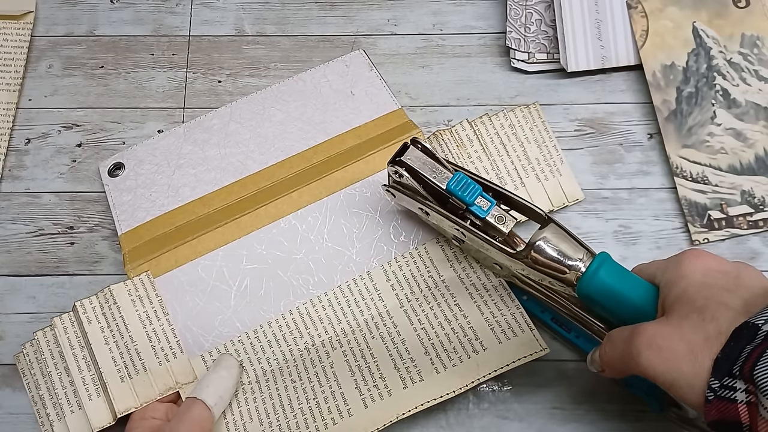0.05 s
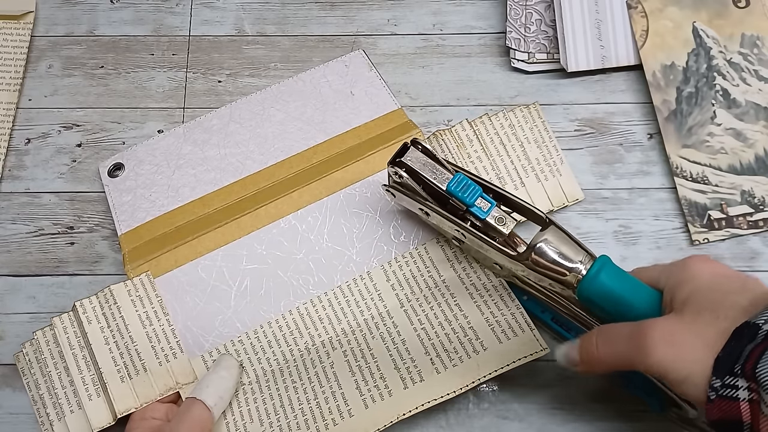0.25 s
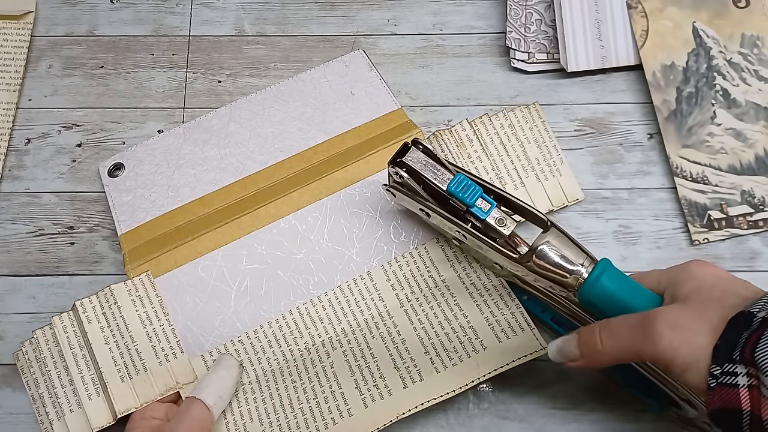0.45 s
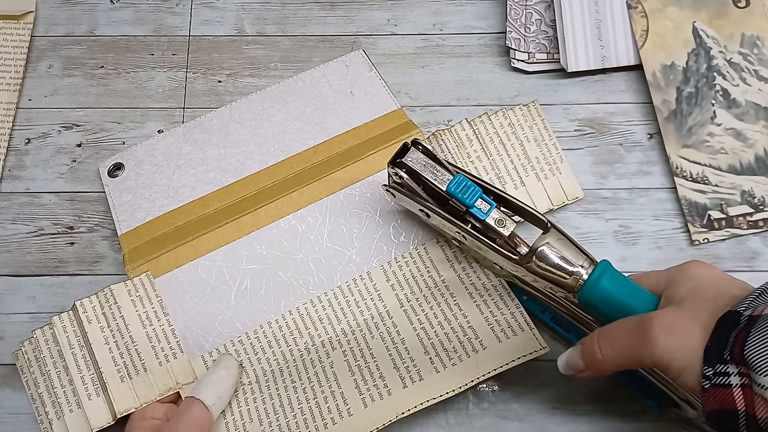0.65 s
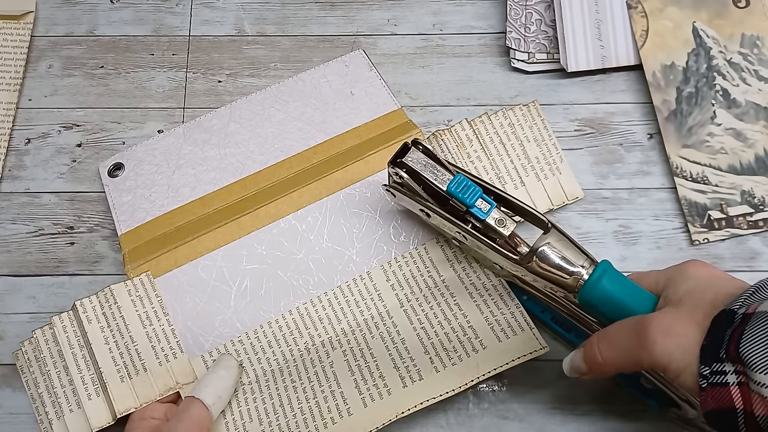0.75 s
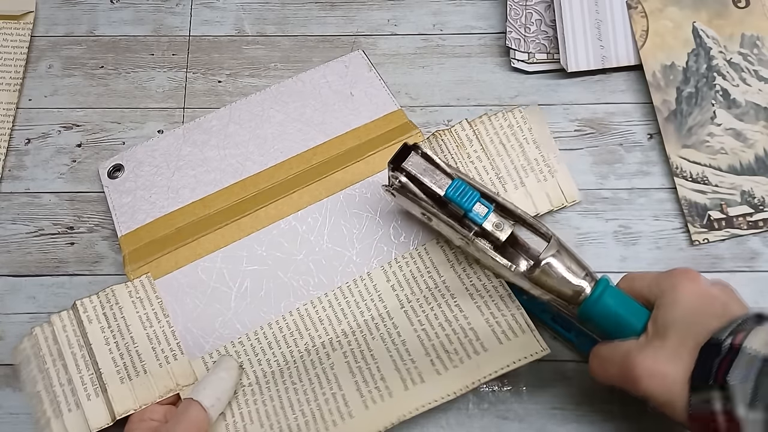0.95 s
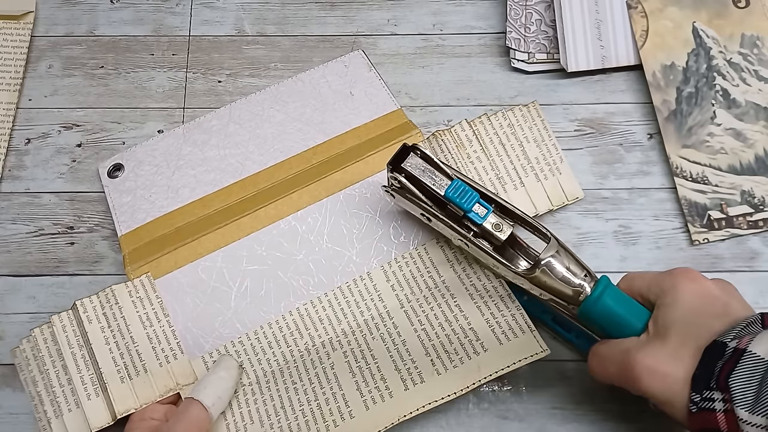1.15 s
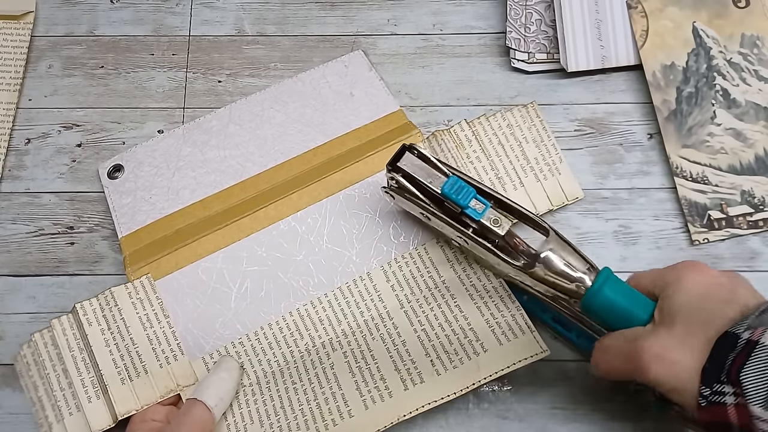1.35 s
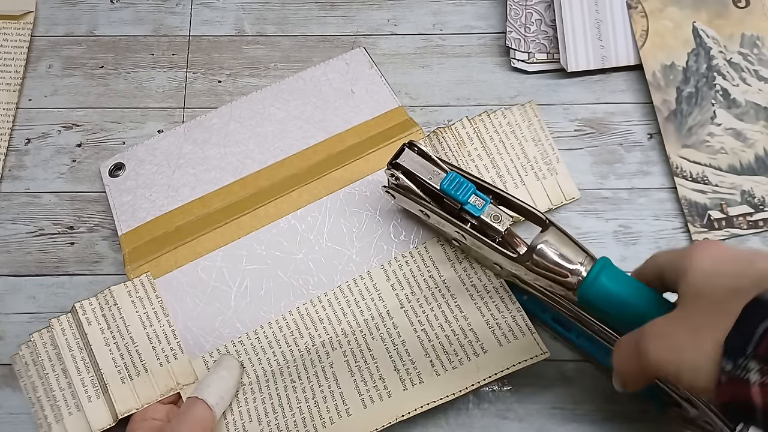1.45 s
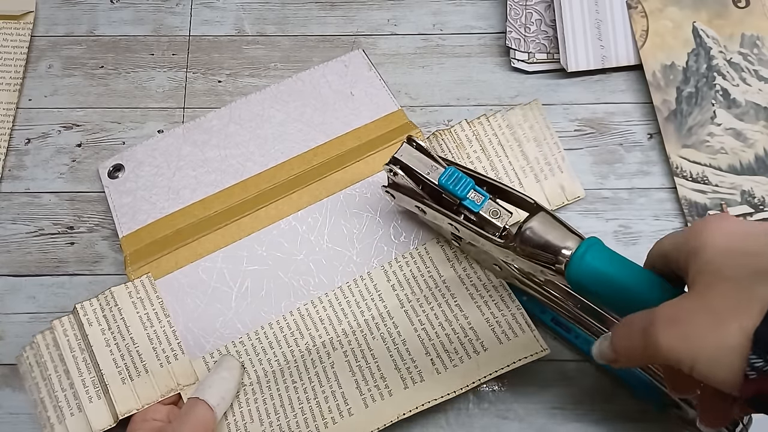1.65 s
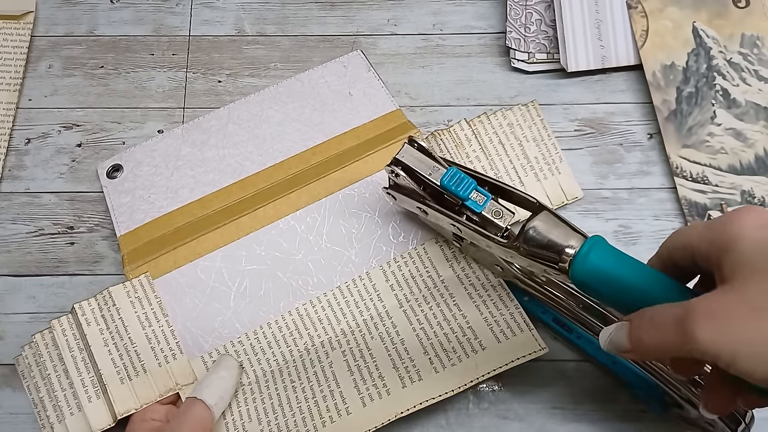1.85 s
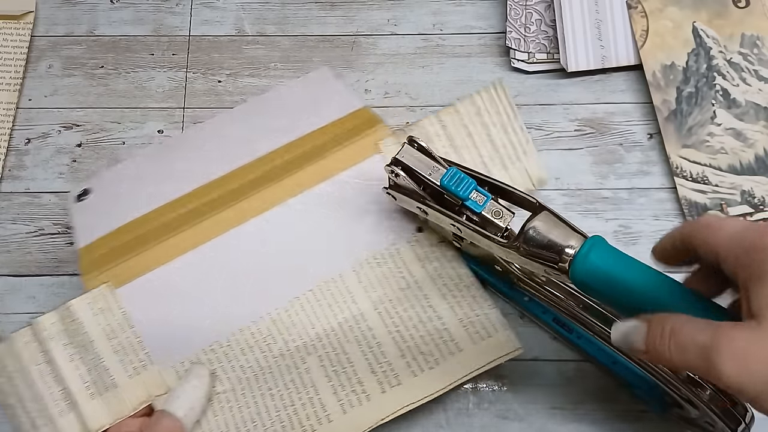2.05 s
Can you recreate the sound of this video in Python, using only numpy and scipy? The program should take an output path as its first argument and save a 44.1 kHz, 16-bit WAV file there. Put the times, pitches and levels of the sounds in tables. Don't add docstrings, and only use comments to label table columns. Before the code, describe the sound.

A hand punch cuts through card on a wooden desk, heard close in a small quiet room. Faint rubbing until 0.35 s, then a stuttering crunch in two pushes, quickening almost to a tone before a loud snap and desk thump at 0.8 s. A faint spring hum lingers. Jaws scrape and click around 1.2-1.37 s, the hinge squeaks at 1.4, clicks follow at 1.57 and 1.77, and a latch drops at 2.07.

```python
import sys
import numpy as np
from scipy import signal
from scipy.fft import rfft, irfft, next_fast_len
from scipy.io import wavfile
from scipy.ndimage import uniform_filter1d

SR = 44100
rng = np.random.default_rng(int(sys.argv[2]) if len(sys.argv) > 2 else 0)


def gain_from_db(level_db):
    decades = np.asarray(level_db, float) / 20
    return 10 ** decades


def inscribe(sig):
    pcm = np.round(np.clip(np.atleast_2d(sig).T, -1, 1) * 32767)
    wavfile.write(sys.argv[1], SR, pcm.astype(np.int16))


N = 92521
T = np.arange(N) / SR

# (time [s], jerk rate [Hz], force [dB], tearing of fibres [dB])
STROKES = [
    [(.35, 76, -52.5, -92.5), (.39, 93.24, -47.5, -81), (.44, 118.1, -45, -78.5), (.49, 70.56, -43.5, -67),
     (.53, 98.7, -41.5, -66.5), (.555, 95.3, -37, -52.5), (.588, 98.9, -45, -67)],
    [(.614, 69.37, -39, -57.5), (.64, 82.15, -40, -68), (.69, 105.1, -39.5, -55.5),
     (.72, 143.1, -36.5, -55), (.738, 222.8, -36, -55.5), (.75, 285.6, -41.5, -57), (.764, 373, -44, -58),
     (.787, 415, -47, -51.5)],
]
# (frequency [Hz], level [dB], T60 [s])
DESK_MODES = [(82.8, -19, 0.29), (126.9, -1.5, 0.15), (178, -10.5, 0.14)]
# (frequency [Hz], level [dB], T60 [s])
STEEL_MODES = [(2930, -4, .025), (5200, -6, .015), (6200, -4, .02), (7150, -3, .02), (8800, -6, .015),
               (11500, -8, .012), (13000, -5, .015)]


def curve(table, f):
    a = np.array(table, float)
    return np.interp(np.log(np.maximum(f, 1)), np.log(a[:, 0]), a[:, 1])


def shaped(x, gain):
    n = next_fast_len(x.shape[-1] + 4096)
    spectrum = rfft(x, n) * gain(np.arange(n // 2 + 1) * SR / n)
    return irfft(spectrum, n)[..., :x.shape[-1]]


def below(hz, power=4):
    return lambda f: 1 / np.sqrt(1 + (f / hz) ** power)


def above(hz):
    return lambda f: 1 / np.sqrt(1 + (hz / (f + 1)) ** 4)


def unit(x):
    return x / np.sqrt(np.mean(x ** 2))


def swell(s, rise, fall):
    return np.clip((T - s) / rise, 0, 1) ** 2 * np.exp(-3 * np.maximum(T - s - rise, 0) / fall)


def train(times, db):
    x = np.zeros(N)
    at = np.clip((np.asarray(times) * SR).astype(int), 0, N - 1)
    np.add.at(x, at, gain_from_db(np.asarray(db)))
    return x


def soft(x):
    contact_s = 0.00076
    push = np.hanning(int(contact_s * SR) + 3)
    return np.convolve(x, push / push.sum())[:N]


def ring(x, modes):
    out = 0
    for k, (hz, db, t60) in enumerate(modes):
        r = np.exp(-np.log(1000) / (t60 * SR))
        w = 2 * np.pi * hz / SR
        mode = signal.lfilter([0, np.sin(w)], [1, -2 * r * np.cos(w), r * r], x)
        out = out + (-1) ** k * gain_from_db(db) * mode
    return out


def crackle(noise):
    # (frequency [Hz], level per Hz [dB])
    crack_spectrum = [(880, -34.5), (1500, -5), (6170, -4.5), (9410, -8), (11200, -6), (14900, -4),
                      (16500, -11.5)]
    return unit(shaped(noise, lambda f: gain_from_db(curve(crack_spectrum, f)) * above(1200)(f) ** 2))


def burst(x, tau_s):
    env = signal.lfilter([1], [1, -np.exp(-1 / (tau_s * SR))], x)
    return env * crackle(rng.standard_normal(N))


def tool_ring(x):
    # (frequency [Hz], level [dB], T60 [s])
    handle_modes = [(732.4, 0, 0.032), (832.7, -3, 0.056), (1039, 3, 0.01)]
    jaw_modes = [(1306, -6.5, 0.013), (1621, -7, 0.0077), (1946, -6, 0.013), (2332, -15.5, 0.035),
                 (2480, -13, 0.018), (2782, -13.5, 0.021)]
    band = signal.butter(3, (480, 3100), "band", fs=SR, output="sos")
    return signal.sosfilt(band, ring(x, handle_modes) + ring(x, jaw_modes))


def bodies(desk, card, tool, steel):
    # (frequency [Hz], level [dB], T60 [s])
    card_modes = [(228.9, -7, 0.054), (311, -10.5, 0.051), (356.8, -14, 0.1), (421.6, -8.5, 0.081),
                  (534, -24.5, 0.05)]
    wood = ring(soft(desk), DESK_MODES) - ring(soft(card), card_modes)
    return wood + tool_ring(tool) + ring(steel, STEEL_MODES)


def hits():
    # (time [s], desk [dB], card [dB], tool [dB], crack [dB])
    first_hits = [(0.7879, -19, -13.5, -27, -48.5), (0.8167, -41.5, -1.5, -19.5, -13.5),
                  (0.823, -37.5, -11.5, -27, -13.5), (0.827, -12.5, -2, -26, -28),
                  (0.836, -12.5, -10, -24.5, -24), (0.891, -37, -46.5, -39.5, -44),
                  (1.269, -51, -35, -42, -55), (1.2855, -68, -46, -38.5, -27), (1.288, -73, -25, -39, -31),
                  (1.309, -61, -48, -33.5, -47.5), (1.316, -33.5, -22.5, -17.5, -17.5),
                  (1.3245, -58.5, -37, -32, -28), (1.335, -49, -28, -46, -38.5),
                  (1.342, -51.5, -29, -28.5, -24), (1.351, -52, -37, -29, -36.5),
                  (1.362, -51, -32, -36.5, -46), (1.368, -34, -33, -39.5, -43),
                  (1.454, -57, -40.5, -50, -46.5), (1.474, -55.5, -49, -68, -42.5),
                  (1.56, -52, -71, -35.5, -18), (1.57, -40.5, -28, -27, -42), (1.585, -47.5, -35, -35, -49),
                  (1.624, -59.5, -36, -42, -60), (1.639, -72.5, -59.5, -56.5, -70.5),
                  (1.7718, -43, -14.5, -19.5, -31.5), (1.777, -28.5, -31, -27, -31),
                  (1.784, -43, -31, -31, -39)]
    last_hits = [
        (2.053, -85, -55, -40.5, -73),
        (2.0688, -67, -71.5, -37, -42.5),
        (2.09, -86, -56.5, -53.5, -55),
    ]
    split_hz, crack_s = 4200, 0.003
    set_down_s, set_down_hz = 1.7, 7000
    s, desk, card, tool, crack = np.array(first_hits + last_hits).T
    low = below(split_hz, 6)
    dull = shaped(burst(train(s, tool - 6), crack_s), low)
    bright = shaped(burst(train(s, crack), crack_s), lambda f: np.sqrt(1 - low(f) ** 2))
    bright = np.where(T < set_down_s, bright, shaped(bright, below(set_down_hz)))
    struck = bodies(train(s, desk), train(s, card), train(s, tool), train(s, crack - 10.5))
    return struck + dull + bright


def creep():
    # (frequency [Hz], level [dB], T60 [s])
    gripped_card = [(225, -0.5, 0.045), (290, -2.5, 0.041), (433.7, -0.5, 0.041)]
    gripped_tool = [(710, -6, .025), (854, -1, 0.027), (1100, -4, .014), (1340, -4, 0.012),
                    (1534, -7.5, 0.016), (2050, -13.5, 0.013), (2450, -18, 0.02), (2830, -20.5, 0.019)]
    desk_db, card_db, tool_db, tear_db = -16, 3, 5.5, 14
    jitter, scatter_db, steady_hz = 0.08, 2.5, 170
    grind_s, grind_db, tear_s = 0.0036, -30, 0.0039
    rows = []
    for stroke in STROKES:
        s, rate, force, tear = np.array(stroke).T
        t = T[(T >= s[0]) & (T < s[-1])]
        turns = np.cumsum(np.interp(t, s, rate)) / SR
        k = np.arange(60)
        jerk_hz = np.interp(np.interp(k, turns, t), s, rate)[:, None]
        c = rng.standard_normal((60, 5)) / (1 + (jerk_hz / steady_hz) ** 2)
        at = np.interp(k + jitter * c[:, 0], turns, t)
        jerks = np.c_[at, np.interp(at, s, force), np.interp(at, s, tear), scatter_db * c]
        rows.append(jerks[k < turns[-1]])
    at, force, tear, _, *uneven = np.vstack(rows).T

    def grind(x):
        env = signal.lfilter([1], [1, -np.exp(-1 / (grind_s * SR))], x)
        return x + gain_from_db(grind_db) * env * rng.standard_normal(N)

    desk = ring(soft(train(at, force + desk_db + uneven[0])), DESK_MODES)
    card = ring(soft(grind(train(at, force + card_db + uneven[1]))), gripped_card)
    tool = ring(grind(train(at, force + tool_db + uneven[2])), gripped_tool)
    tool = signal.lfilter([1, -1], [1, -.9], tool)
    fibres = burst(train(at, tear + tear_db + uneven[3]), tear_s)
    fibres = shaped(fibres, lambda f: above(6100)(f) * below(10500, 12)(f))
    return shaped(desk - card + tool, above(140)) + fibres


def whine():
    # (multiple [1], centre [s], length [s], level [dB])
    tones = [
        (1, .745, .03, -37.5),
        (1, .766, 0.021, -35.5),
        (3, 0.68, 0.048, -42.5),
        (4, 0.85, .025, -42),
        (4, 0.85, .025, -39),
        (2, 1, .02, -46.5),
    ]
    s, rate = np.array(STROKES[1]).T[:2]
    phase = 2 * np.pi * np.cumsum(np.interp(T, s, rate)) / SR
    out = 0
    for m, mid, length, db in tones:
        env = np.cos(np.pi * np.clip((T - mid) / length, -.5, .5)) ** 2
        out = out + gain_from_db(db) * env * np.sin(round(m) * phase)
    return out


def parts():
    # (frequency [Hz], level [dB], T60 [s])
    die_modes = [(1340, -7.5, 0.053), (1595, -8, 0.052), (2216, -2.5, 0.02), (2616, -2, 0.018),
                 (2840, -1.5, .025), (3670, -8, 0.013), (5020, -3, 0.013)]
    pin_modes = [(10830, -2, .04), (10930, -4.5, 0.035)]
    latch_modes = [(729, 1, .04), (960, -3.5, 0.023), (1244, -15.5, 0.038), (1570, -4.5, 0.018),
                   (1870, -16.5, 0.0223)]
    # (time [s], level [dB])
    die_hits = [
        (.8168, -20),
        (.821, -23),
        (.826, -33.5),
        (.8355, -36),
        (1.2855, -33.5),
        (1.316, -34),
    ]
    pin_hits = [
        (1.316, -18),
        (1.3245, -22.5),
        (.8168, -24),
        (1.2, -51.5),
    ]
    latch_hits = [(1.989, -64), (2.0, -67), (2.015, -59), (2.029, -55), (2.039, -50), (2.048, -46),
                  (2.054, -39), (2.061, -45.5), (2.0675, -21.5), (2.078, -44), (2.087, -42), (2.094, -37.5)]

    def struck(blows, modes):
        return ring(train(*np.array(blows).T), modes)

    return struck(die_hits, die_modes) + struck(pin_hits, pin_modes), struck(latch_hits, latch_modes)


def scrapes():
    # (start [s], rise [s], fall [s], hiss [dB], tool [dB])
    slides = [
        (1.196, 0.02, 0.042, -39, -49),
        (1.27, 0.018, 0.053, -37, -32),
        (1.326, 0.013, 0.049, -35, -39),
        (1.378, 0.028, 0.28, -54.5, -51),
        (1.972, 0.1, 0.068, -52.5, -42),
        (0.79, 0.023, 0.067, -32, -40),
    ]
    uneven = uniform_filter1d(rng.exponential(size=(2, N)), 40)
    grains = unit(rng.standard_normal((2, N)) * gain_from_db(uneven * 5.3))
    hiss, shake = 0, 0
    for s, rise, fall, hiss_db, tool_db in slides:
        env = swell(s, rise, fall)
        hiss = hiss + gain_from_db(hiss_db) * env
        shake = shake + gain_from_db(tool_db - 24.5) * env
    steel = ring(hiss * grains[1] * gain_from_db(-26.5), STEEL_MODES)
    return hiss * crackle(grains[0]) + tool_ring(shake * grains[1]) + steel


def squeak():
    # (multiple [1], level [dB])
    squeal_partials = [(1, 0), (2, -27)]
    whistle_partials = [(1, -2), (2, -3), (3, -10), (4, -10.5), (5, -7), (6, -12)]
    squeal_s, squeal_len_s, squeal_hz = 1.416, 0.048, 420
    tail_db, tail_s = -32, 0.072
    whistle_s, whistle_len_s, whistle_hz, sag_hz = 1.402, 0.064, 1239, 24
    spring_s, spring_stop_s, spring_hz, spring_db, spring_t60_s = 0.63, 1.195, 894, -55.5, 3.4
    wobble = uniform_filter1d(rng.standard_normal((2, N)), 500) * 22

    def arch(s, length):
        return np.sin(np.pi * np.clip((T - s) / length, 0, 1)) ** 2

    def harmonics(hz, partials):
        phase = 2 * np.pi * np.cumsum(hz) / SR
        return sum(gain_from_db(db) * np.sin(round(m) * phase) for m, db in partials)

    env = arch(squeal_s, squeal_len_s) + gain_from_db(tail_db) * arch(squeal_s + squeal_len_s - .01, tail_s)
    squeal = gain_from_db(-34) * env * harmonics(squeal_hz * (1 + 0.0064 * wobble[0]), squeal_partials)
    pitch = whistle_hz - sag_hz * (T - whistle_s) / whistle_len_s
    whistle = harmonics(pitch * (1 + 0.00763 * wobble[1]), whistle_partials)
    whistle = gain_from_db(-43.5 + 2.2 * wobble[0]) * arch(whistle_s, whistle_len_s) * whistle
    on = (T > spring_s) * np.clip((spring_stop_s - T) / 0.0079, 0, 1)
    decay = gain_from_db(spring_db - 60 * (T - spring_s) / spring_t60_s)
    return squeal + whistle + on * decay * np.sin(2 * np.pi * spring_hz * T)


def rubs():
    # (start [s], rise [s], fall [s], level [dB])
    shifts = [
        (0.047, 0.007, 0.22, -71.5),
        (0.148, 0.0063, 0.0087, -59),
        (0.176, 0.005, 0.034, -60.5),
        (0.191, 0.0032, 0.25, -64.5),
        (0.233, 0.004, 0.028, -60.5),
        (0.31, 0.002, 0.036, -62),
        (1.489, 0.011, 0.11, -65),
        (1.217, 0.025, 0.1, -54),
    ]
    uneven = uniform_filter1d(rng.exponential(size=(3, N)), 100)
    grains = unit(rng.standard_normal((3, N)) * gain_from_db(uneven * 39))
    x = sum(gain_from_db(db - 13.5) * swell(s, rise, fall) for s, rise, fall, db in shifts) * grains
    return bodies(x[0] * gain_from_db(-8), x[1], x[2] * gain_from_db(-16.5), np.zeros(N))


def settling():
    # (start [s], rise [s], fall [s], level [dB])
    sways = [
        (.83, 0.048, 0.11, -31),
        (0.73, 0.05, .05, -58),
        (1.57, 0.02, 0.12, -50),
        (0.97, 0.03, 0.05, -49),
        (1.95, .1, 0.1, -64),
    ]
    # (time [s], frequency [Hz], level [dB])
    ticks = [
        (1.72, 1072, -56.5),
        (1.9027, 3140, -52),
        (1.947, 3036, -55.5),
    ]
    sway_hz, tick_t60_s = 47, 0.018
    out = 0
    for s, rise, fall, db in sways:
        out = out + gain_from_db(db) * swell(s, rise, fall) * np.sin(2 * np.pi * sway_hz * (T - s))
    for s, hz, db in ticks:
        out = out + ring(train([s], [db]), [(hz, 0, tick_t60_s), (hz * 1.45, -8, tick_t60_s / 2)])
    return out


def two_ports(x):
    # (frequency [Hz], left lead [rad])
    port_phase = [(150, 0.43), (500, .55), (1300, 1.64), (16000, 1.32)]
    # (frequency [Hz], left over right [dB])
    port_level = [(100, -0.5), (700, -0.5), (3000, -0.5), (14000, 3.5)]

    def half(f):
        return gain_from_db(curve(port_level, f) / 2) * np.exp(.5j * curve(port_phase, f))

    return np.array([shaped(x, half), shaped(x, lambda f: 1 / half(f))])


def scatter(x):
    t = T[:1024]
    decay_s = 0.003
    echo = unit(rng.standard_normal((2, 1024)) * np.exp(-t / decay_s)) * gain_from_db(-2) / 32
    return shaped(signal.fftconvolve(x, echo, axes=1)[:, :N], above(1500))


def room(x):
    # (frequency [Hz], level [dB], T60 [s])
    bands = [(148, -2.5, 0.21), (614, -5, 0.19), (2400, -2.5, 0.2), (7060, -9, 0.2), (14000, -7, 0.16)]
    t = T[:SR // 2]
    tail, centres = 0, np.array(bands)[:, 0]
    mid, side = rng.standard_normal((2, len(t)))
    onset = np.clip((t - .003) / 0.014, 0, 1)
    for k, (hz, db, t60) in enumerate(bands):
        def weight(f):
            return np.interp(np.log(f + 1), np.log(centres), np.arange(len(centres)) == k)

        apart = shaped(side, lambda f: weight(f) * np.clip(f / 1400.0, .15, 1))
        pair = shaped(mid, weight) + apart * np.array([[1], [-1]])
        per_energy = np.sqrt(np.log(1e6) / (t60 * SR) / 2)
        tail = tail + pair * gain_from_db(db - 60 * t / t60) * per_energy * onset
    return signal.fftconvolve(x[None], tail, axes=1)[:, :N]


def noise_floor():
    # (frequency [Hz], level [dB])
    floor_spectrum = [(15, -21), (25, -9), (117, 4.5), (607, -14), (911, -11), (1130, -19), (7710, -26.5),
                      (11900, -25.5), (16000, -35.5)]
    noise = rng.standard_normal((2, N)) + 0.6 * rng.standard_normal(N)
    return gain_from_db(-74.5) * unit(shaped(noise, lambda f: gain_from_db(curve(floor_spectrum, f))))


def scene():
    steel, latch = parts()
    places = [creep() + whine() + rubs() + latch, hits() + squeak() + settling(), scrapes() + steel]
    direct = [two_ports(x) for x in places]
    return sum(p + scatter(p) for p in direct) + room(sum(places)) + noise_floor()


def low_pass(x):
    return signal.sosfilt(signal.butter(12, 16990, fs=SR, output="sos"), x)


def record(dry):
    bass_cut = signal.butter(2, 35, "high", fs=SR, output="sos")
    top_cut = signal.ellip(6, .2, 25, 15700, fs=SR, output="sos")
    limited = np.tanh(signal.sosfilt(bass_cut, dry))
    return low_pass(signal.sosfilt(top_cut, limited))


dry = scene()
out = record(dry)
inscribe(out)
```